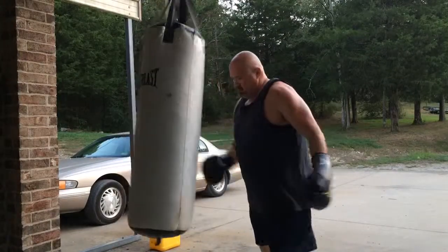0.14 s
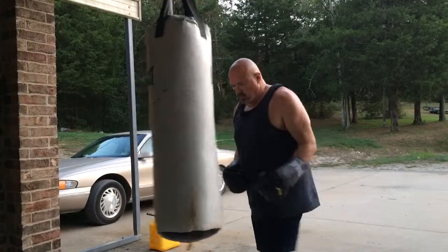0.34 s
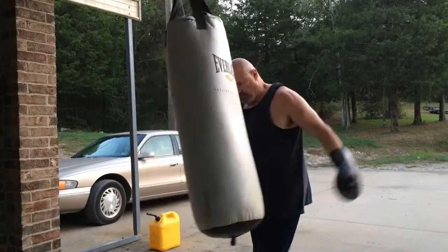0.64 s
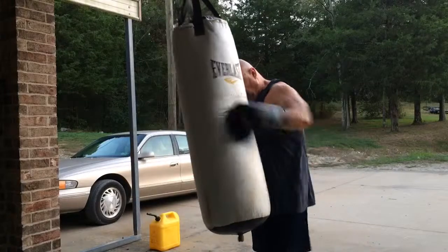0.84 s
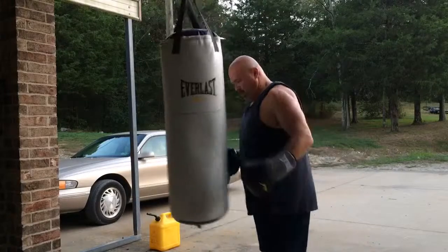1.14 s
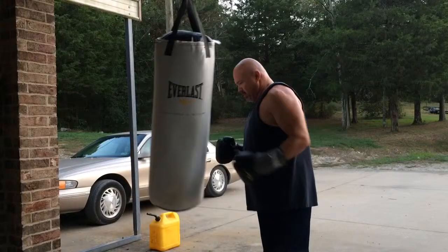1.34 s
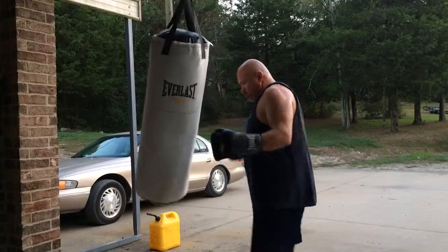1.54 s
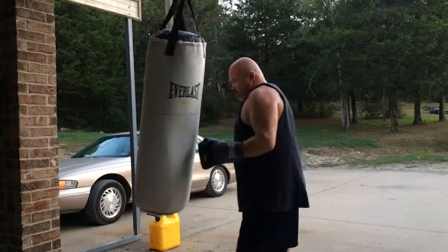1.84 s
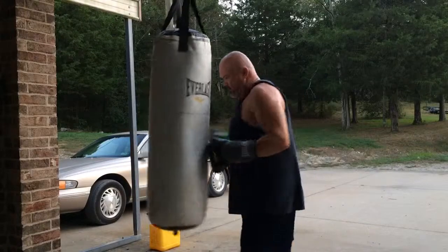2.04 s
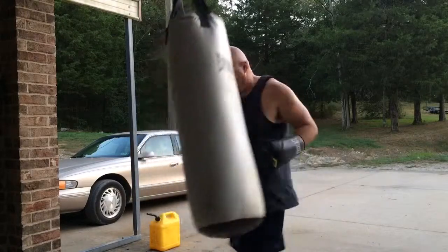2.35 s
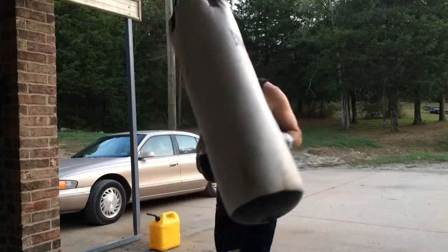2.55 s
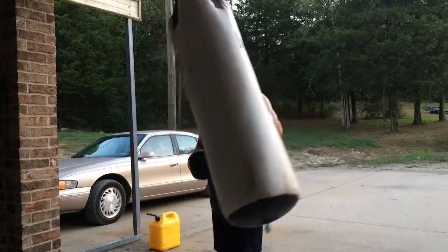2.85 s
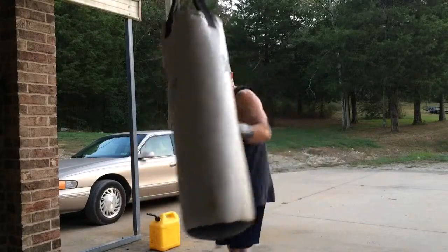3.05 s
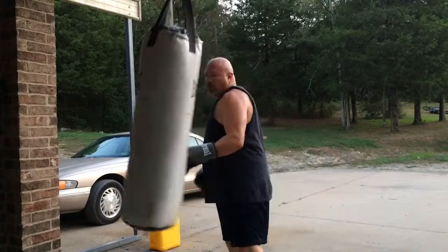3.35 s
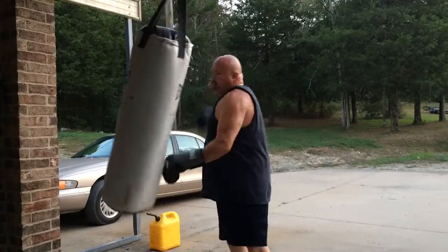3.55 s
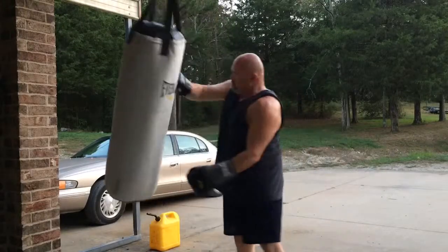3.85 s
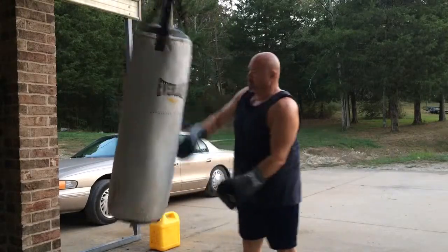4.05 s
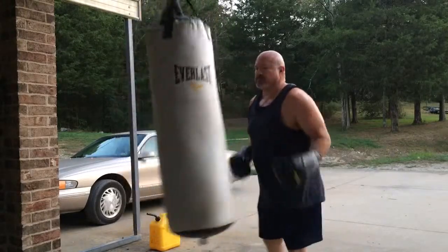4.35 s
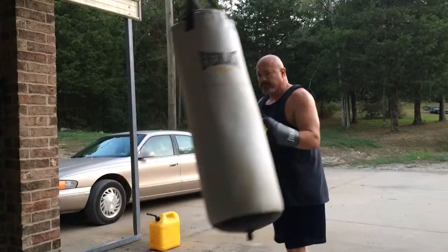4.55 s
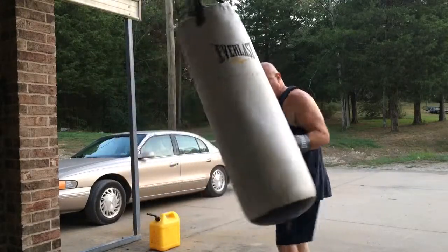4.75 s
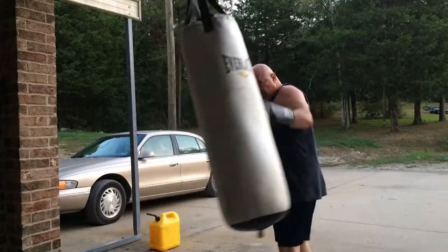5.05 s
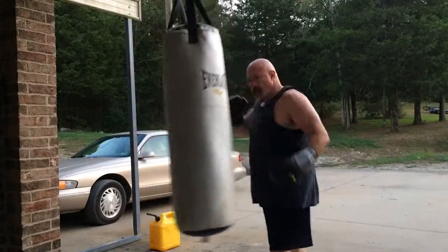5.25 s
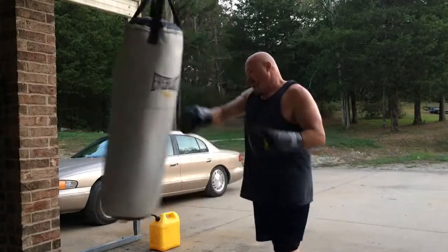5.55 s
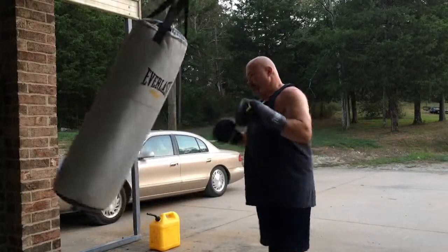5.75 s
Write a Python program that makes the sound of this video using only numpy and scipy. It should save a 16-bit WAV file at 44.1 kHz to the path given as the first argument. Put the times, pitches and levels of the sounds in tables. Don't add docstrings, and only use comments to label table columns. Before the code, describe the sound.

A heavy bag on a steel stand takes spaced gloved punches: one at the start, others near 0.9, 2.3, 3.9 and 5.5 seconds, with faint touches between. Each sharp slap and low thud sets chain links clinking, straps snapping and a hook knocking. Close microphone outdoors by a garage, short echo, quiet air and faint insects.

```python
import sys
import numpy as np
from scipy import signal
from scipy.fft import rfft, irfft
from scipy.io import wavfile
from scipy.ndimage import uniform_filter1d

SR = 44100
rng = np.random.default_rng(int(sys.argv[2]) if len(sys.argv) > 2 else 0)


def waveform_to_disk(signal):
    frames = np.transpose(np.atleast_2d(signal))
    scaled = np.clip(frames, -1, 1) * 32767
    samples = np.round(scaled).astype(np.int16)
    wavfile.write(sys.argv[1], SR, samples)


def to_linear_factor(level_db):
    exponent = np.asarray(level_db, float) / 20
    return 10 ** exponent


N = 259749

# [f/Hz, level/dB]
YARD_COLOUR = [(20, -13), (130, -5.5), (320, -8.5), (650, -23.5), (1190, -17.5), (2460, -40), (6000, -35),
               (12300, -30.5), (15300, -20)]
# [f/Hz, width/Hz, level/dB]
INSECT_BAND = (4320, 300, -64.5)
# [t/s, level/dB]
INSECT_SWELLS = [
    (0, 1),
    (1.58, -13),
    (1.66, 0),
    (1.85, -14),
    (2.03, -6),
    (2.2, -17),
    (2.9, -5.5),
    (3.2, -9),
    (3.7, -11),
    (5.89, -15),
]
# [f/Hz, time to fall 60 dB/s]
GARAGE_ECHO = [(100, 0.47), (400, 0.25), (1500, 0.43), (5000, 0.31), (14000, 0.26)]
# [t/s, effort/dB]
EFFORT = [(0, -65), (.13, -65), (.56, -52.5), (.9, -76), (1.11, -54.5), (1.4, -61.5), (1.75, -82),
          (2.26, -70), (2.45, -60.5), (3.12, -63), (3.71, -61.5), (3.85, -72), (4.05, -58.5), (4.75, -55),
          (5.03, -64.5), (5.43, -64), (5.55, -39.5), (5.89, -59.5)]
# [f/Hz, level/dB]
RUSTLE_COLOUR = [(290, -46), (500, -13), (1000, -14), (1710, -7.5), (1890, -6.5), (2830, -9), (4400, -9.5),
                 (15300, -24.5)]
# [peak t/s, rise/s, fall/s, hum level/dB, chatter level/dB]
SHAKES = [(0.015, 0.0028, 0.097, -22, -47), (.2, 0.33, 0.25, -35, -42.5), (.42, 0.054, 0.12, -35, -44),
          (.6, 0.1, 0.083, -35, -49.5), (.76, 0.16, 0.76, -39, -52.5), (0.937, 0.0033, 0.13, -23.5, -36),
          (1.17, 0.069, 0.089, -42, -46), (1.339, 0.14, 0.11, -33, -61), (1.675, 0.057, 0.068, -40, -62),
          (2.02, 0.16, 0.15, -37.5, -53.5), (2.276, 0.0059, 0.17, -26, -36.5),
          (2.6, 0.37, 0.31, -42.5, -54), (2.82, 0.11, 0.41, -42.5, -54), (3.15, 0.14, 0.16, -43.5, -55.5),
          (3.462, 0.093, 0.17, -32.5, -59), (3.7, 0.097, 0.11, -44, -51.5),
          (3.884, 0.006, 0.28, -25.5, -29), (4.219, 0.098, 0.11, -28, -39.5),
          (4.45, 0.12, 0.097, -26.5, -31.5), (4.608, 0.013, 0.35, -29.5, -37.5),
          (4.77, 0.51, 0.32, -37, -58), (5.08, 0.012, 0.51, -43.5, -49.5), (5.471, 0.0078, 0.14, -25, -48),
          (5.75, 0.45, 0.13, -28, -37)]
# [f/Hz, width/Hz, level/dB]
FRAME_MODES = [(135, 77, -11.5), (208.9, 22.3, 2), (240, 20, -3), (306.5, 59, -1.5), (359.6, 33.5, 0.5),
               (417, 83, -6.5)]
# [f/Hz, width/Hz, level/dB]
TUBE_MODES = [(573, 100, -14), (961, 155, 6.5), (1038, 68, 5), (1150, 105, 6.5), (1310, 49, 9),
              (1410, 51, 6.5), (1728, 70, 4.5), (1880, 54, 3), (2320, 88, -10), (2880, 33, -14)]
# [start t/s, length/s, f/Hz, width/Hz, level/dB]
RUBS = [(0.463, 0.024, 4000, 1800, -44), (.466, 0.055, 3300, 500, -48), (1.44, 0.17, 3140, 1100, -68),
        (.305, .055, 2350, 400, -55), (.4, .07, 2300, 500, -55), (2.52, .03, 4200, 1200, -55),
        (3.452, .045, 3500, 3000, -50), (3.533, .022, 7000, 9000, -55), (3.565, 0.168, 8000, 14000, -54),
        (3.027, .07, 3100, 1800, -61), (5.192, 0.026, 1740, 700, -50), (4.551, 0.06, 4960, 6000, -48),
        (1.658, 0.084, 750, 500, -54.5), (1.971, 0.1, 1880, 1190, -58.5), (2.66, 0.06, 2230, 500, -57),
        (2.71, 0.085, 2330, 350, -64), (1.869, 0.039, 2000, 1836, -45), (4.842, 0.013, 6700, 250, -51),
        (5.02, 0.043, 4980, 90, -67), (5.11, 0.019, 6800, 120, -54.5), (5.184, 0.01, 6600, 250, -47.5)]
# [start t/s, length/s, from f/Hz, to f/Hz, width/Hz, level/dB]
STRAP_TWIST = (2.63, .085, 1800, 3300, 500, -58)
# [t/s, peak level/dB, time to fall 60 dB/s]
STRAP_SNAPS = [(.15, -25.5, 0.074), (.251, -30, 0.051), (.268, -32.5, 0.12), (1.868, -39.5, 0.12),
               (1.878, -34.5, 0.073), (2.177, -47, 0.022), (2.484, -40, 0.055), (2.7681, -49, 0.033),
               (2.349, -31, 0.067), (2.402, -31.5, 0.053), (3.465, -49, 0.042), (4.654, -45, 0.038),
               (4.763, -35, .04), (4.792, -35.5, 0.046), (5.2, -39, 0.054), (5.593, -28, 0.04),
               (5.656, -24, 0.022), (2.2806, -7.5, 0.015), (2.513, -44, 0.061), (4.4009, -23, 0.085),
               (4.4247, -27.5, 0.096), (5.28, -38.5, 0.051), (5.747, -19.5, 0.035)]
# [f/Hz, level/dB]
SNAP_COLOUR = [(1180, 8), (2000, 9.5), (4920, 7), (7260, 2), (10900, -0.5), (12000, -42), (15600, -66),
               (22000, -120)]
# [t/s, strap level/dB, hook level/dB, tube f/Hz]
CHAIN_JOLTS = [(0.0204, -30, -19.5, 1100), (0.1106, -22.5, -25, 1180), (0.196, -25.5, -26, 1470),
               (0.4633, -42, -44, 1310), (0.995, -33, -28.5, 960), (1.098, -32, -33, 1410),
               (1.206, -38, -39, 1410), (1.668, -51, -31, 1150), (2.609, -46, -40, 1140),
               (2.789, -34, -36.5, 1160), (3.311, -43.5, -39, 1150), (3.448, -32, -27, 1020),
               (3.9129, -21.5, -19.5, 1360), (3.9517, -17, -18.5, 1310), (4.0727, -27, -30, 1250),
               (4.134, -27.5, -27.5, 1220), (4.18, -33, -26, 1410), (4.318, -33.5, -33.5, 1440),
               (4.373, -33.5, -31, 1280), (4.4394, -22, -26.5, 1350), (4.605, -21.5, -28.5, 1140),
               (4.633, -47, -30, 1480), (4.735, -26.5, -25.5, 1200), (4.8433, -42, -36.5, 1400),
               (5.186, -34, -29.5, 1410), (5.542, -18.5, -18.5, 1310), (5.5717, -19.5, -26, 1260),
               (5.696, -27.5, -31, 1290), (5.759, -26, -23.5, 1410)]
# [t/s, tick level/dB, ring level/dB, place along the three links, 0 to 2]
LINK_HITS = [(0.1135, -9, -22, 0.21), (0.1998, -28, -32.5, 0.61), (0.275, -12, -22, 1.2),
             (0.465, -20, -41, 1.3), (0.996, -14, -58, .6), (1.097, -33, -33.5, 0.033),
             (1.2087, -25, -50, 0.27), (2.352, -34, -40.5, 0.98), (2.611, -22, -64, 1.7),
             (3.4475, -27, -45, 0.97), (3.9146, -8, -32, .4), (3.9521, -12, -19, 2.3),
             (3.971, -2, -21.5, .3), (4.0743, -30, -35, 0.94), (4.132, -14, -31, 1.5),
             (4.181, -27, -33, .05), (4.374, -19, -34, 2.7), (4.4255, -13, -32.5, 0.62),
             (4.442, -8.5, -25, 0.75), (4.606, -14, -28.5, 1.4), (4.6338, -8, -31.5, 0.2),
             (4.7347, -17, -31.5, 2.1), (5.183, -18.5, -45, 0.89), (5.278, -35.5, -45.5, 0.5),
             (5.541, -6, -22, .05), (5.5743, -10, -26.5, 1.4), (5.595, -11, -42, 1.3),
             (5.635, -15, -38, 1.4), (5.6968, -8.5, -18, 1.5), (5.7581, -6, -19, 0.7)]
# [f/Hz, level/dB, time to fall 60 dB/s]
LINK_MODES = [
    [(12535, 0, .2), (12480, -5, .17), (12655, -8, .12)],
    [(13070, 0, .22), (13100, -6, .17), (13010, -10, .1)],
    [(13830, 0, .18), (13680, -2, .13), (13760, -8, .1), (15180, -16, .12)],
]
# [t/s, peak level/dB, f/Hz, time to fall 60 dB/s]
FRAME_JERKS = [(0.537, -36, 347.3, 0.27), (0.027, -18, 126, 0.11), (0.085, -28, 178, 0.11),
               (0.943, -22, 96, 0.062), (0.965, -21, 254, 0.18), (1.29, -25, 295, 0.056),
               (1.336, -41.5, 236, 0.14), (1.949, -34.5, 322, 0.077), (2.282, -13, 145.4, 0.14),
               (2.406, -27.5, 208, 0.059), (2.946, -37.5, 194, 0.16), (1.169, -41, 75, 0.17),
               (2.278, -16, 410, 0.054), (2.79, -41.5, 60, 0.23), (3.204, -34, 113, 0.12),
               (3.884, -15.5, 287, 0.11), (4.301, -35, 60.4, 0.15), (5.249, -30.5, 60.5, 0.084),
               (5.701, -40, 69, 0.52), (2.348, -23.5, 156, 0.18), (2.789, -29.5, 202, 0.081),
               (3.451, -22.5, 280.4, 0.14), (3.498, -18.5, 156, 0.064), (3.417, -34, 295, 0.059),
               (3.53, -29.5, 255, 0.15), (3.689, -36.5, 300, 0.084), (3.893, -17.5, 137, 0.094),
               (4.196, -29, 404, 0.15), (4.235, -34, 330, 0.13), (4.387, -26, 340, 0.085),
               (4.606, -24.5, 195.5, 0.36), (4.756, -21.5, 195.4, 0.31), (5.08, -26, 198, 0.12),
               (5.103, -23, 150.4, 0.14), (5.4664, -6.5, 241, 0.038), (5.49, -17, 203, 0.077),
               (5.512, -23, 189, 0.12), (5.535, -22, 250, 0.064), (5.549, -28, 310, 0.084),
               (5.005, -44, 310, 0.095), (5.248, -37.5, 330, .07), (5.306, -40, 168, .08),
               (5.406, -40, 400, 0.065), (5.76, -26, 237, .1), (5.702, -32.5, 344, 0.63)]
# [start t/s, length/s, f/Hz, peak level/dB]
FLAT_LANDING = (3.9602, .0085, 1370, -9)
# [t/s, peak level/dB, strongest tube f/Hz]
HOOK_KNOCKS = [(0.166, -26.5, 1410), (0.426, -33.5, 1310), (1.285, -41.5, 1880), (1.628, -36.5, 1310),
               (1.922, -31.5, 1310), (1.948, -34.5, 1310), (1.987, -30, 1120), (2.016, -33.5, 1040),
               (2.045, -35.5, 990), (2.578, -31, 1200), (2.665, -40, 1220), (3.385, -33.5, 1310),
               (3.398, -31.5, 1160), (3.462, -25.5, 1310), (3.564, -35.5, 1400), (3.971, -25, 1200),
               (4.391, -23.5, 1500), (4.469, -33, 1160), (5.407, -40, 1340), (5.419, -38.5, 1360),
               (5.538, -23, 1350), (5.59, -27.5, 1260), (5.605, -38, 1300), (5.643, -43, 1390),
               (5.684, -39, 1290), (5.749, -27.5, 1330), (5.78, -34, 1250), (5.875, -44, 1380),
               (5.501, -28.5, 1410), (5.657, -30, 1310), (5.719, -27, 1270)]
# [t/s, peak level/dB, strongest tube f/Hz]
HOOK_TAPS = [(0.13, -31, 1320), (0.1515, -27, 1270), (0.1786, -25, 1390), (0.2232, -24, 1300),
             (0.254, -27, 1380), (0.2776, -28.5, 1380), (0.3676, -39, 980), (0.3843, -33, 1270),
             (0.408, -32, 1310), (0.458, -34, 1120), (0.479, -47, 961), (0.5683, -51, 1130),
             (0.605, -43, 1450), (0.6978, -49, 972), (0.718, -31, 1230), (0.743, -37.5, 1310),
             (0.766, -34.5, 1150), (0.818, -51, 1280), (0.8659, -47, 1270), (0.902, -36, 960),
             (1.137, -34, 1340), (1.1744, -45, 1390), (1.257, -42, 1310), (1.299, -33.5, 1820),
             (1.337, -37, 921), (1.352, -37.5, 939), (1.5628, -46, 1410), (1.964, -37, 1290),
             (2.0611, -28.5, 880), (2.1763, -52, 1260), (2.336, -34, 1390), (2.381, -32, 1310),
             (2.4053, -30, 1310), (2.481, -39, 1330), (2.5133, -37, 1480), (2.5294, -50, 1190),
             (2.7012, -40.5, 1200), (2.762, -42, 1230), (2.8524, -36.5, 1210), (2.952, -44, 1150),
             (2.9881, -48, 1410), (3.117, -38.5, 1130), (3.1475, -37.5, 1220), (3.174, -39, 1280),
             (3.26, -47, 1140), (3.358, -36, 1280), (3.4196, -36, 1180), (3.4795, -27, 960),
             (3.6177, -45, 1390), (3.683, -50, 1390), (3.718, -40.5, 1340), (4.0123, -26, 1420),
             (4.3025, -43, 1360), (4.676, -32, 1410), (4.7459, -19, 1140), (4.9219, -57, 1240),
             (5.0175, -47, 1107), (5.2092, -34, 1800), (5.3387, -38.5, 1240), (5.3782, -42, 1370)]
# [t/s, height of the suction spike]
CONTACTS = [
    (.0143, .72),
    (.9359, .8),
    (2.2738, .27),
    (3.2026, .005),
    (3.8813, .33),
    (5.0735, .02),
    (5.4651, .12),
]
# [slap level/dB, bag level/dB, deep thump level/dB, slap length/s]
BLOWS = [
    (-13.5, -22, -37, 0.013),
    (-18, -25, -30, 0.0049),
    (-21.5, -17.5, -24.5, 0.0072),
    (-40, -47, -59, 0.0073),
    (-13, -22.5, -29, 0.0018),
    (-35, -36, -41.5, 0.022),
    (-22, -27.5, -34.5, 0.02),
]
# [t/s, spike height, negative is suction]
SPIKE_ECHOES = [(.0175, -.25), (.0208, .45), (.0226, .3), (.0234, .45), (.9397, -.25), (2.2807, -.4),
                (2.2824, -.35), (2.2833, -.3), (2.288, -.15), (3.8825, -.25), (3.8848, -.15), (3.8866, .2)]
# [f/Hz, level/dB]
SLAP_COLOUR = [(240, -44), (400, -60), (662, -1), (1980, -3.5), (2950, -8), (3650, -7.5), (5180, -8),
               (15300, -21)]


def evened(x):
    return x / np.sqrt(np.mean(x ** 2) + 1e-20)


def sine(cycles):
    return np.sin(2 * np.pi * cycles)


def fade(db, t, t60):
    return to_linear_factor(db - 60 * t / t60)


def read(points, hz):
    f, value = np.transpose(points)
    return np.interp(np.log(hz + 1), np.log(f + 1), value)


def add(mix, s, sound):
    part = mix[max(round(s * SR), 0):][:len(sound)]
    part += sound[:len(part)]


def colour(x, spectrum):
    gain = to_linear_factor(read(spectrum, np.fft.rfftfreq(len(x), 1 / SR)))
    return evened(irfft(rfft(x) * gain, len(x)))


def resonate(x, hz, width):
    r = np.exp(-np.pi * width / SR)
    return 2 * signal.lfilter([1 - r], [1, -r * np.exp(2j * np.pi * hz / SR)], x).real


def band(x, hz, width):
    return evened(resonate(resonate(x, hz, width), hz, width))


def body(x, modes):
    parts = [(-1) ** k * to_linear_factor(db) * resonate(x, hz, width) for k, (hz, width, db) in enumerate(modes)]
    return evened(sum(parts))


def grains(per_s, spread_db):
    size = to_linear_factor(spread_db * np.minimum(rng.exponential(1, N), 4)) * rng.choice([-1, 1], N)
    return size * (rng.random(N) < per_s / SR)


def fits(length, size):
    return to_linear_factor(3 * evened(uniform_filter1d(rng.standard_normal(length), size=size)))


def curve(rows, count):
    columns = np.transpose(rows)
    return np.interp(np.arange(N) / SR, columns[0], columns[count])


def shaking(count):
    t, rows = np.arange(0, N, 32) / SR, np.array(SHAKES)
    late = t - rows[:, :1]
    away = np.maximum(-late / abs(rows[:, 1:2]), late / abs(rows[:, 2:3]))
    drop_db = 20 * away ** 2
    power = to_linear_factor(2 * (rows[:, count, None] - drop_db)).sum(0)
    return np.interp(np.arange(N) / SR, t, np.sqrt(power))


def yard():
    hz, width, db = INSECT_BAND
    throb = 1 + 0.26 * evened(uniform_filter1d(rng.standard_normal(N), 500))
    insects = band(rng.standard_normal(N), hz, width) * throb * to_linear_factor(curve(INSECT_SWELLS, count=1))
    return to_linear_factor(-55) * colour(rng.standard_normal(N), YARD_COLOUR) + to_linear_factor(db) * insects


def garage(x):
    taps = np.zeros((3, SR // 2))
    jitter = rng.integers(0, 10, (3, (SR // 2 - 151) // 10))
    at = np.arange(150, SR // 2 - 10, 10) + jitter
    np.put_along_axis(taps, at, rng.choice([-1., 1.], at.shape), 1)
    hz, t, z = signal.stft(taps, SR, nperseg=256)
    tails = signal.istft(z * fade(0, t, read(GARAGE_ECHO, hz)[:, None]), SR, nperseg=256)[1]
    tails = tails / np.linalg.norm(tails[0])
    turn = 9 * np.arange(N) / SR + np.arange(3)[:, None] / 3
    shared = x * np.cos(2 * np.pi * turn) * np.sqrt(2 / 3)
    return signal.fftconvolve(shared, tails, axes=1).sum(0)[:N]


def rustle():
    folds = uniform_filter1d(uniform_filter1d(rng.standard_normal(N), size=2000), size=2000)
    rub = colour(grains(5000, 0.81), RUSTLE_COLOUR) * to_linear_factor(1.5 * evened(folds))
    high = signal.sosfilt(signal.butter(2, 6000, "high", fs=SR, output="sos"), rub)
    grit = (to_linear_factor(2) - 1) * high
    return (to_linear_factor(curve(EFFORT, count=1)) + to_linear_factor(-28) * shaking(count=4)) * (rub + grit)


def stand():
    effort_db = curve(EFFORT, count=1) + 60
    hum = to_linear_factor(-7.5) * shaking(count=3) + to_linear_factor(-68 + 0.077 * effort_db)
    chatter = to_linear_factor(-3) * shaking(count=4) + to_linear_factor(-72.5 + 1.2 * effort_db)
    rocking = to_linear_factor(-21.5) * shaking(count=3) + to_linear_factor(-64 + 1.3 * effort_db)
    sound = hum * body(grains(600, 2.2), FRAME_MODES)
    sound += chatter * body(grains(900, 4.2), TUBE_MODES)
    sound += rocking * body(rng.standard_normal(N), [(54.3, 7.7, -8.5), (126, 27, -6)])
    return sound


def drags():
    out = np.zeros(N)
    for s, length, hz, width, db in RUBS:
        rub = rng.standard_normal(int(length * SR))
        add(out, s, to_linear_factor(db) * band(rub, hz, width) * signal.windows.tukey(len(rub), .45))
    return out


def swish():
    out, (s, length, from_hz, to_hz, width, db) = np.zeros(N), STRAP_TWIST
    slow = band(rng.standard_normal(int(length * SR)), 0, width)
    cycles = np.cumsum(np.linspace(from_hz, to_hz, len(slow))) / SR
    add(out, s, to_linear_factor(db) * slow * sine(cycles) * signal.windows.tukey(len(slow), .6))
    return out


def snaps():
    out, t = np.zeros(N), np.arange(8000) / SR
    with_jolts = [(s, db, 0.11) for s, db, *_ in CHAIN_JOLTS]
    for s, db, t60 in STRAP_SNAPS + with_jolts:
        catches = 1 + 3 * (rng.random(len(t)) < 250 / SR)
        grit = fits(len(t), 200) * catches * rng.standard_normal(len(t))
        burst = colour(grit, SNAP_COLOUR) * np.minimum(t / .004, 1)
        add(out, s - .0015, to_linear_factor(db - 6.5) * burst * (fade(0, t, t60) + 1.1 * np.exp(-t / 0.0032)))
    return out


def clinks():
    out, t = np.zeros((len(LINK_MODES), N)), np.arange(SR // 3) / SR
    luck = rng.random((len(LINK_HITS), 20))
    for (s, tick_db, ring_db, place), draw in zip(LINK_HITS, luck):
        link_db = ring_db - 6 * abs(np.arange(len(LINK_MODES)) - place)
        chance = iter(draw)
        seat = 1 + .003 * (draw[0] - .5)
        tick = resonate(rng.standard_normal(len(t)), 13400, 3100) * np.exp(-t / 0.01)
        add(out[0], s - .001, to_linear_factor(tick_db - 15) * tick)
        for link, level, group in zip(out, link_db, LINK_MODES):
            ring = np.zeros(len(t))
            for hz, db, t60 in group:
                start_db = level + db + 3 - 6 * next(chance)
                ring += fade(start_db, t, t60) * sine(hz * seat * t + next(chance))
            add(link, s - .001, ring * np.minimum(t / 0.0073, 1))
    touch = uniform_filter1d(uniform_filter1d(rng.standard_normal(out.shape), size=400), size=400)
    return (out * to_linear_factor(4 * np.clip(evened(touch), -2.5, 1))).sum(0)


def jerks():
    out, t = np.zeros(N), np.arange(SR // 2) / SR
    for s, db, hz, t60 in FRAME_JERKS:
        note = sine(hz * t) + 0.18 * sine(0.4 * hz * t)
        add(out, s, fade(db, t, t60) * note * np.minimum(t / 0.0049, 1))
    return out


def clack():
    out, (s, length, hz, db) = np.zeros(N), FLAT_LANDING
    t = np.arange(int(length * SR)) / SR
    add(out, s, to_linear_factor(db) * np.hanning(len(t)) * sine(hz * t))
    return out


def knocks():
    out, t = np.zeros(N), np.arange(4000) / SR
    jolted = [(s + 0.003977, db, hz) for s, _, db, hz in CHAIN_JOLTS]
    light = [(s, db - 5, hz) for s, db, hz in HOOK_TAPS]
    f, _, mode_db = np.transpose(TUBE_MODES)[:, :, None]
    for s, db, hz in HOOK_KNOCKS + jolted + light:
        phase, size, detune = rng.random((3, len(TUBE_MODES), 1))
        shake = rng.standard_normal(len(t))
        octaves = abs(np.log2(f / hz))
        near_db = mode_db - 7.3 * np.minimum(octaves / 0.31, 1.5) - 0.78 * size
        pitch = f * (1 + 0.093 * (detune - .5))
        rings = fade(near_db, t, .035) * sine(pitch * t + phase)
        sound = rings.sum(0) * np.sin(np.pi / 2 * np.minimum(t / .0035, 1)) ** 2
        rattle = evened(signal.fftconvolve(shake, sound[:1000])[:len(t)]) * np.minimum(t / .008, 1)
        click = evened(resonate(resonate(shake, 1500, 1800), 1500, 1600)) * np.exp(-t / .004)
        add(out, s - .002, to_linear_factor(db - 16) * click)
        add(out, s - .003, to_linear_factor(db + 4) * (sound / abs(sound).max() + fade(-10, t, 0.11) * rattle))
    return out


def punches():
    out, lead, t = np.zeros(N), 400, np.arange(SR // 3) / SR
    before = np.arange(-lead, 0) / SR
    for (s, spike), (slap_db, bag_db, deep_db, spread) in zip(CONTACTS, BLOWS):
        squeeze = -spike * np.exp(before / .00007)
        squeeze -= to_linear_factor(bag_db + 5) * np.exp(before / 0.0026) * (1 + before * SR / lead)
        add(out, s - lead / SR, squeeze)

        burst = colour(rng.standard_normal(len(t)), SLAP_COLOUR)
        crumple = fits(len(t), 300)
        dying = np.exp(-t / max(spread, .002)) + 0.28 * crumple * np.exp(-t / 0.065)
        slap = to_linear_factor(slap_db - 6.5) * burst * dying

        bag_hz = 216 * (1 + 0.056 * np.exp(-t / 0.034))
        sag = np.cumsum(bag_hz) / SR
        bag = fade(bag_db + 11.5, t, 0.042) * sine(sag)
        bag += fade(bag_db + 3, t, 0.071) * sine(0.82 * sag) * np.minimum(t / 0.0097, 1)

        fall = 48 * t + 0.23 * (1 - np.exp(-t / 0.0047))
        deep = fade(deep_db + 11, t, 0.11) * sine(fall) * np.minimum(t / 0.0047, 1)

        suction = spike * np.exp(-t / .00004)
        add(out, s, (slap + bag + deep) * np.minimum(t / .0006, 1) - suction)
    for s, height in SPIKE_ECHOES:
        add(out, s - 20 / SR, height * np.exp(-abs(np.arange(-20, 20)) / 2.2))
    return out


def scene():
    background = yard() + rustle() + stand()
    straps = drags() + swish() + snaps()
    chain = clinks()
    hook = jerks() + knocks()
    blows = punches()
    echo = garage(to_linear_factor(-7) * blows + to_linear_factor(-11) * hook + to_linear_factor(-3) * straps + to_linear_factor(-8) * chain)
    return (background + straps + chain + hook + clack() + blows + echo)[None]


def low_pass(x):
    return signal.sosfilt(signal.butter(12, 16630, fs=SR, output="sos"), x)


def record(dry):
    soft = 1.2 * np.tanh(dry / 1.2)
    edges_hz = [0, 15250, 15450, 16500, 16700, SR / 2]
    taps = signal.firwin2(401, edges_hz, [1, 1, .02, .015, 0, 0], fs=SR)
    mix = signal.oaconvolve(soft, taps[None], "same")
    return low_pass(mix)


dry = scene()
out = record(dry)
waveform_to_disk(out)
```